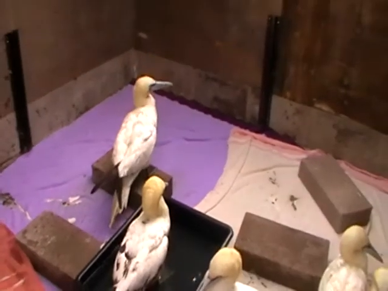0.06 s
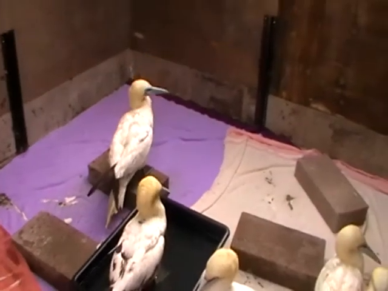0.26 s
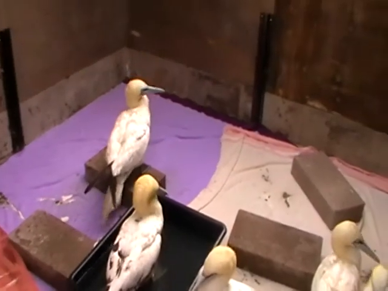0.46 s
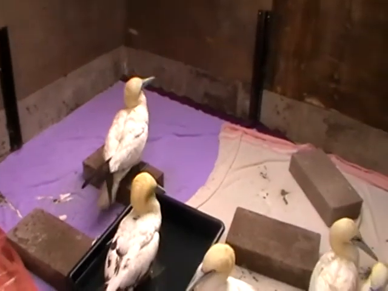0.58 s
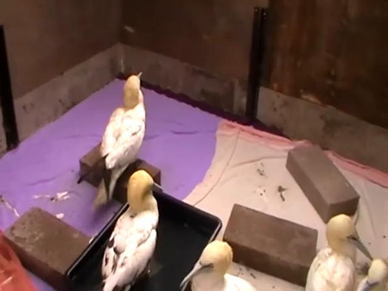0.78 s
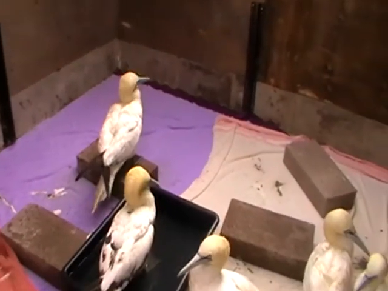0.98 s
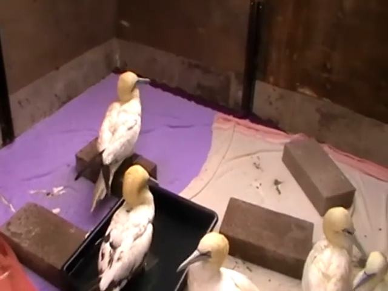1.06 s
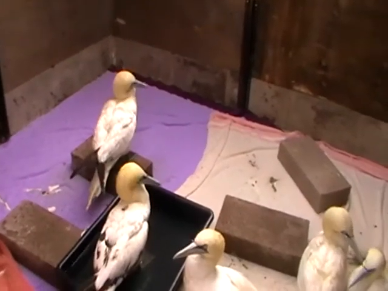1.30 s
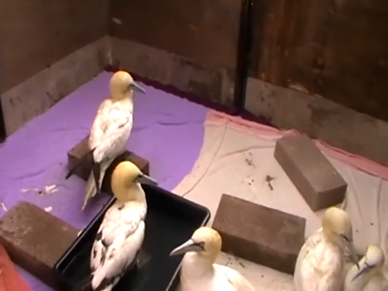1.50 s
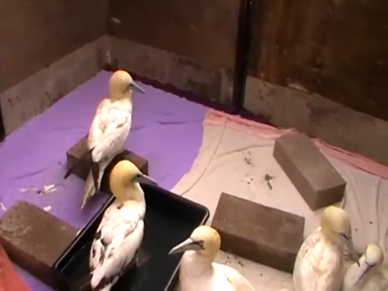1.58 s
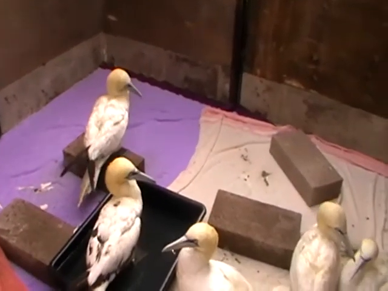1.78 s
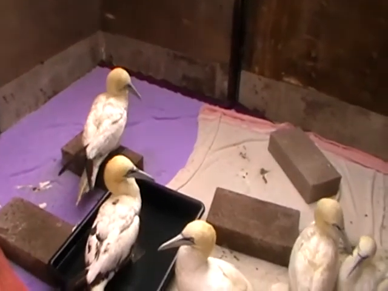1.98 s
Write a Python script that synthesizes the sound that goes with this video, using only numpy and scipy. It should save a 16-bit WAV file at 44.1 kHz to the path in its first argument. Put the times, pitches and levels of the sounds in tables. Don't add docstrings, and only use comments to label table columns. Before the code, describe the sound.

A large seabird gives one harsh, raspy scream in a hard-walled pen over steady ventilation hum

```python
import sys
import numpy as np
from scipy import signal
from scipy.fft import rfft, irfft, next_fast_len
from scipy.io import wavfile
from scipy.ndimage import uniform_filter1d, map_coordinates

SR = 44100
rng = np.random.default_rng(int(sys.argv[2]) if len(sys.argv) > 2 else 0)


def ratio(d):
    e = np.asarray(d, float) / 20
    return 10 ** e


def transcribe(u):
    v = np.clip(np.atleast_2d(u).T, -1, 1)
    q = np.round(v * 32767).astype(np.int16)
    wavfile.write(sys.argv[1], SR, q)


N = 90404

# freq_hz, density_db (per Hz)
HUM_SPECTRUM = [(28, -42), (40, -6), (136, -2.5), (350, -0.5), (700, -3.5), (4140, -16.5), (10000, -37),
                (15600, -45)]
# freq_hz, correlation
HUM_LIKENESS = [(60, 0.89), (240, .93), (950, 0.79), (3770, 0.58), (8000, 0.82), (12000, 0.065)]
# freq_hz, left_minus_right_db
HUM_LEAN = [(60, 0.5), (380, 0.0), (2380, -3), (15000, 1)]
# freq_hz, t60_s
PEN_DECAY = [(1000, 0.3), (2600, 0.53), (10000, 0.13)]
# time_s, level_db, throat_ring_db
RASP = [
    (.19, -60, -20),
    (.228, -38, -15),
    (.295, -41, -10),
    (.34, -55, -10),
    (.44, -43, -5),
    (.62, -40, -3),
    (.88, -34, 2),
    (1.04, -37, 2),
    (1.09, -56, 0),
]
# centre_hz, width_hz, level_db
THROAT = [(1370, 110, -17), (1583, 90, 11), (1756, 42, 11), (2114, 37, 13.5), (2229, 25, 13),
          (2640, 40, 13.5), (3580, 14, -12), (4770, 13, 0), (5670, 14, -17)]
# freq_hz, density_db (per Hz)
RASP_SPECTRUM = [(1200, 5.5), (2160, -11), (2700, 2.5), (5500, -17.5), (6200, -17), (8700, -23.5),
                 (10800, -35), (13500, -52)]
# freq_hz, density_db (per Hz)
WHEEZE_SPECTRUM = [(3000, -32), (4000, 7), (5700, -15.5), (6300, -1.5), (8800, -12), (11000, -21.5),
                   (14500, -40)]
# time_s, pitch_hz, level_db, wander_hz, overtone_lift_db
LOW_HALF = [
    (.24, 1580, -55, 11.65, -4),
    (0.263, 1560, -34.5, 11.3, 0),
    (.305, 1538, -35.5, 12.3, -6),
    (.35, 1532, -50.5, 8.6, -2),
    (0.431, 1481, -41, 11.5, 4),
    (.455, 1448, -27.5, 12.7, -9),
    (0.589, 1424, -34, 18.4, 0),
    (.79, 1358, -36.5, 19.6, 3.5),
    (.99, 1336, -50, 32, 0.5),
]
# time_s, pitch_hz, level_db, coupling_db (of the halves)
HIGH_HALF = [
    (0.228, 2767, -41.5, -56),
    (0.246, 2640, -28.5, -40.5),
    (0.367, 2612, -47.5, -78),
    (0.381, 2641, -28.5, -68),
    (0.439, 2574, -34.5, -56),
    (0.472, 2550, -53.5, -48.5),
    (0.579, 2484, -50, -43.5),
    (0.698, 2435, -45, -46.5),
    (0.999, 2331, -46, -48),
]
# time_s, pitch_hz, level_db
SQUEAK = [
    (.28, 3360, -60),
    (.30, 3375, -37),
    (.33, 3390, -30),
    (.365, 3358, -28),
    (.385, 3320, -42),
    (.43, 3290, -40),
    (.52, 3240, -55),
]
SQUEAK_SPLIT = (.315, .35)
# times_low, times_high, level_db (over their mean level)
TONE_LOW = [1, 2, 3, 4, 5, 6, 0, 0, 0, 1, 2, 1]
TONE_HIGH = [0, 0, 0, 0, 0, 0, 1, 2, 3, 1, 1, 2]
TONE_DB = [0, 0, -10, -14, -32, -31, 0, -12, -26, -8, -15, -29]
# times_low, times_high, level_db (over the coupling)
COUPLED_LOW = [-4, -2, -3, 4, -2, -1, -5, 0, 1, -3, 2, 5, 0, 2]
COUPLED_HIGH = [3, 2, 3, -1, 3, 2, 5, 1, 1, 4, -1, -2, 2, 1]
COUPLED_DB = [-2, 1, -5, -6, -4, -10, -8, -6, -8, -11, -15, -11, -10, -9]

PATCHY_DB = 3.5


def unit(x):
    return x / np.sqrt(np.mean(x ** 2) + 1e-20)


def along(points, hz):
    f, v = np.transpose(points)
    return np.interp(np.log(hz + 1), np.log(f + 1), v)


def curves(rows):
    times, *columns = np.transpose(rows)
    t = np.arange(N) / SR
    inside = 1.0 * ((t > times[0]) & (t < times[-1]))
    gate = uniform_filter1d(inside, size=441)
    return [np.interp(t, times, column) for column in columns] + [gate]


def wobble(rate):
    knots = rng.standard_normal(N // 100)
    return map_coordinates(knots, [np.arange(N) * rate / SR])


def filtered(x, response):
    size = next_fast_len(N + SR // 2)
    spectrum = rfft(x, size) * response(np.fft.rfftfreq(size, 1 / SR))
    return irfft(spectrum, size)[..., :N]


def phase(hz):
    return 2 * np.pi * np.cumsum(hz) / SR


def patchy(x, depth_db):
    z = signal.stft(x, nperseg=256)[2]
    field = uniform_filter1d(rng.standard_normal(z.shape), size=2, axis=0)
    field = uniform_filter1d(field, size=7, axis=1)
    return signal.istft(z * ratio(depth_db * unit(field)), nperseg=256)[1][:N]


def hum():
    def colour(hz):
        turn = np.arccos(np.clip(along(HUM_LIKENESS, hz), -1, 1)) / 2
        return ratio(along(HUM_SPECTRUM, hz)) * np.array([np.cos(turn), np.sin(turn)])

    mid, side = filtered(rng.standard_normal((2, N)), colour)
    pair = np.array([mid + side, mid - side])
    pair = filtered(pair, lambda hz: ratio(np.outer([0.5, -0.5], along(HUM_LEAN, hz))))
    fan_db = -64.5 + 1.5 * wobble(8.3)
    fan_hz = 42 + 2.4 * wobble(9.7)
    fan = np.sqrt(2) * ratio(fan_db) * np.sin(phase(fan_hz))
    return ratio(-45 + 0.17 * wobble(8.7)) * unit(pair) + fan


def pen(x):
    tail_db, walls_db = -9, -14
    hz, t, z = signal.stft(rng.standard_normal((2, SR // 2)), SR, nperseg=256)
    decay = ratio(-60 * t / along(PEN_DECAY, hz)[:, None])
    tail = signal.istft(z * decay, SR, nperseg=256)[1]
    tail = tail / np.linalg.norm(tail[0])
    answer = ratio(tail_db) * np.pad(tail, ((0, 0), (400, 0)))
    for side in range(2):
        delays = rng.integers(60, 1200, size=7)
        answer[side, delays] += ratio(walls_db) * rng.uniform(-1.0, 1.0, size=7)
    return signal.fftconvolve(x[None], answer, axes=1)[:, :N]


def wheeze():
    low_db, *_, low_on = curves(LOW_HALF)
    high_db = curves(HIGH_HALF)[1]
    low_db = curves(LOW_HALF)[1]
    breath = patchy(rng.standard_normal(N), PATCHY_DB)
    air = filtered(breath, lambda f: ratio(along(WHEEZE_SPECTRUM, f)) * (f > 2800))
    return low_on * ratio(np.maximum(low_db, high_db) - 19.5) * unit(air)


def throat_ring(f):
    total = 0
    for k, (centre, width, db) in enumerate(THROAT):
        total = total + (-1) ** k * ratio(db) * 1j * f * width / (centre ** 2 - f ** 2 + 1j * f * width)
    return total


def beak_cut(f):
    cutoff_hz = 1305
    return 1 / (1 + (cutoff_hz / (f + 1)) ** 16)


def rasp():
    rate_hz, jitter, size_db, air_share, ring_top_hz = 360, 0.35, 2, 1.1, 5500
    level_db, ring_db, on = curves(RASP)
    count = np.cumsum(rate_hz * np.exp(jitter * wobble(300))) / SR
    starts = np.diff(np.floor(count), prepend=0) > 0
    pulses = unit(starts * ratio(size_db * rng.standard_normal(N)))
    air = unit(rng.standard_normal(N) * (0.12 + np.exp(-3 * (count % 1))))
    source = patchy(pulses + air_share * air, PATCHY_DB)
    broad = unit(filtered(source, lambda f: ratio(along(RASP_SPECTRUM, f)) * beak_cut(f)))
    rung = unit(filtered(source, lambda f: throat_ring(f) * beak_cut(f) / (1 + (f / ring_top_hz) ** 8)))
    return on * ratio(level_db) * (broad + ratio(ring_db) * rung) / np.sqrt(1 + ratio(2 * ring_db))


def tone(db, angle, order):
    flutter_per_s, flutter_db = 55, 2.4
    shake_per_s, shake_db, shake_rad = 260, 1, 0.17
    unsteady_db = flutter_db * wobble(flutter_per_s) + shake_db * wobble(shake_per_s)
    level = np.sqrt(2) * ratio(db + np.sqrt(order) * unsteady_db)
    shake = (1 + order) * shake_rad * wobble(shake_per_s)
    return level * np.sin(angle + shake + rng.uniform(0, 2 * np.pi))


def squeak(low):
    squeak_hz, squeak_db, on = curves(SQUEAK)
    angle = phase(squeak_hz + 25 * wobble(100))
    split, = curves([(s,) for s in SQUEAK_SPLIT])
    beat = 1 - split + split * np.sqrt(2) * np.sin(phase(np.full(N, 93.2)))
    out = beat * tone(squeak_db, angle, order=1)
    out = out + tone(squeak_db - 17, 2 * angle, order=3)
    out = out + tone(squeak_db - 20, angle + low, order=3)
    return on * out


def syrinx():
    wander_per_s = 100
    full_db, fade = -30, 0.15
    low_hz, low_db, wander_hz, lift_db, low_on = curves(LOW_HALF)
    high_hz, high_db, couple_db, high_on = curves(HIGH_HALF)
    wander = wobble(wander_per_s)
    low = phase(low_hz + wander_hz * wander)
    high_wander = 1.75 * wander * (high_db < -38) + 0.5 * wobble(wander_per_s)
    high = phase(high_hz + wander_hz * high_wander)
    out = squeak(low)
    for m, n, db in zip(TONE_LOW, TONE_HIGH, TONE_DB):
        mean_db = (m * low_db + n * high_db) / (m + n)
        fading_db = fade * (m + n - 1) * (mean_db - full_db)
        overtone_db = lift_db * (m > 1 and n == 0)
        on = high_on if n else low_on
        out = out + on * tone(db + mean_db + fading_db + overtone_db, m * low + n * high, order=m + n)
    for m, n, db in zip(COUPLED_LOW, COUPLED_HIGH, COUPLED_DB):
        out = out + high_on * tone(db + couple_db, m * low + n * high, order=3)
    return out


def scene():
    room_tone = hum()
    bird = syrinx() + rasp() + wheeze()
    lean_db = -0.2
    direct = bird * ratio([[lean_db / 2], [-lean_db / 2]])
    return direct + pen(bird) + room_tone


def roll_off(x):
    return signal.sosfilt(signal.butter(12, 15630, fs=SR, output="sos"), x)


def record(dry):
    return roll_off(dry)


dry = scene()
out = record(dry)
transcribe(out)
```